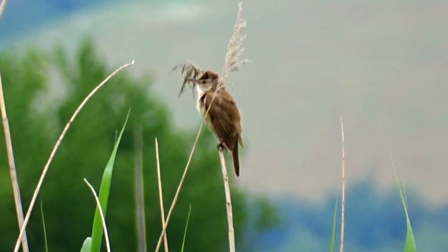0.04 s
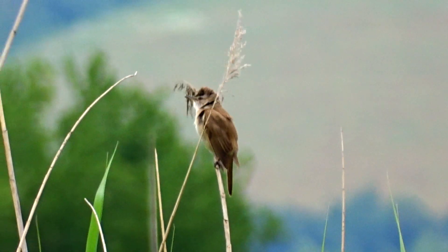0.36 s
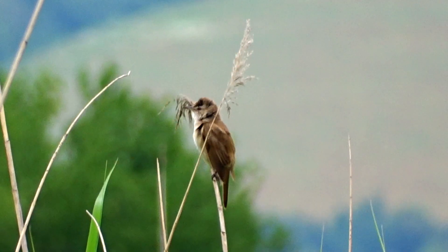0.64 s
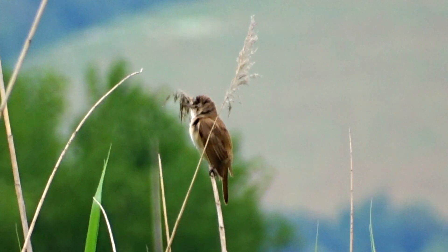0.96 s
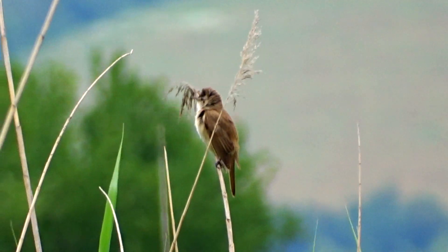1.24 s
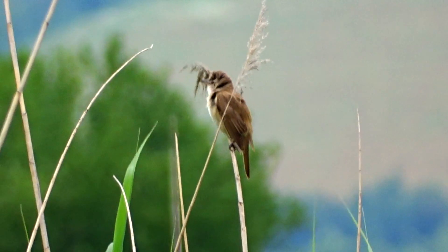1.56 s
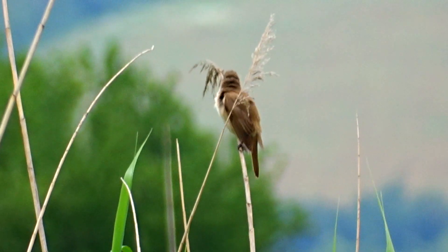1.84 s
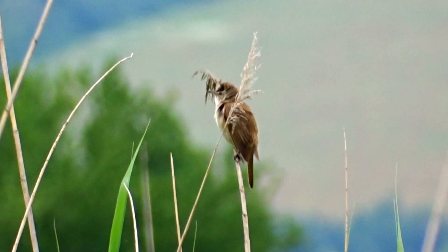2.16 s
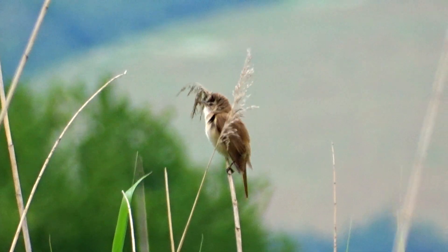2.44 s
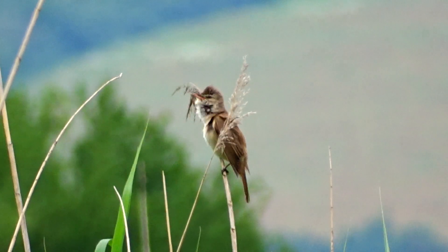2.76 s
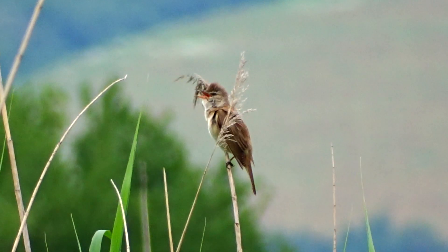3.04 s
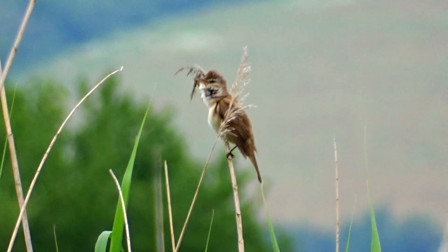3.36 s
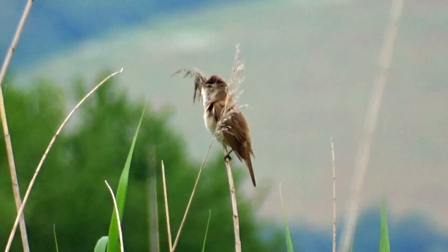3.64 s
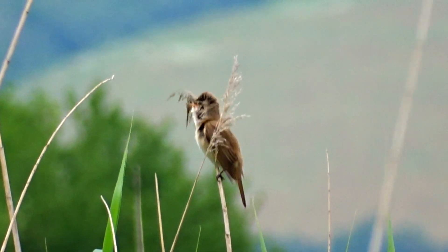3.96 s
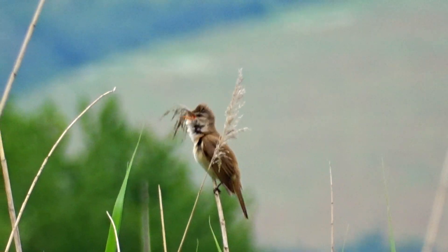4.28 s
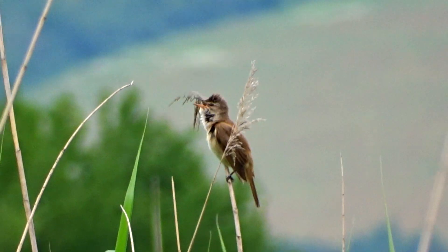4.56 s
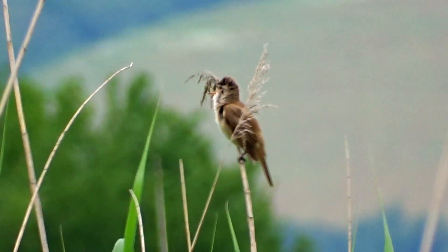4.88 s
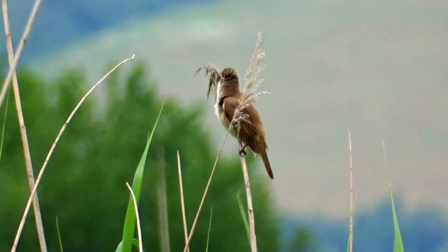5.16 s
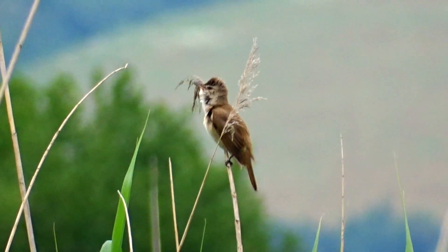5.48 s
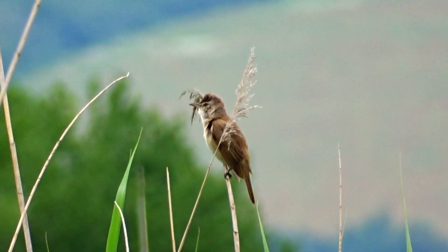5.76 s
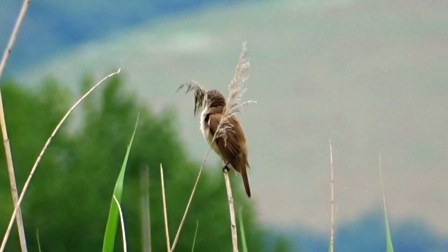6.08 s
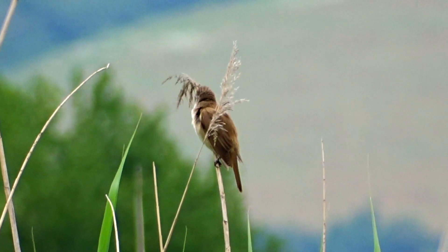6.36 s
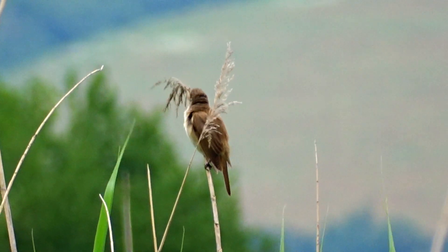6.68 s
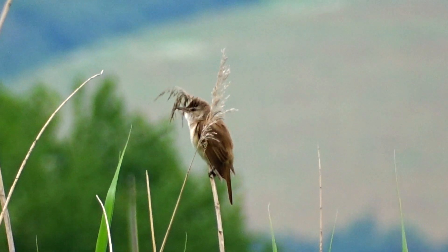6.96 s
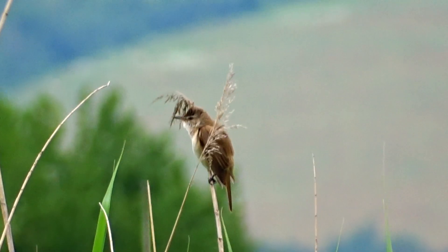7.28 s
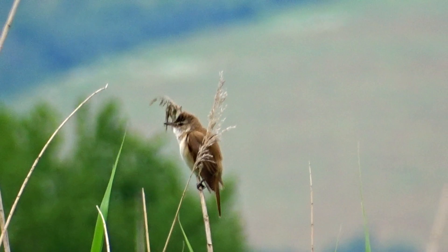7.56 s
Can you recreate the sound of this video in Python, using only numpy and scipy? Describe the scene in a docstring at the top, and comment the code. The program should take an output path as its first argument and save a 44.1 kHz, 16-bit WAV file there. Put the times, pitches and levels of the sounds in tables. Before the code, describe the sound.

Songbirds chirp, whistle and chatter harshly in a reed bed, one croaking close by, while light wind buffets the microphone.

```python
"""A near great reed warbler gives croaks, three loud calls and a nasal note.
Its syrinx is the source of tones and pulses, and the resonances of its throat filter them.
Buzzes, whistles and rasps sound further off; the reed bed scatters every note into a short tail.
Gusts buffet the microphone over a distant rumble and a soft hiss of reeds.
The camera's lens ticks faintly, and two knocks ring the modes of its body."""
import sys
import numpy as np
from scipy import signal
from scipy.fft import rfft, irfft, next_fast_len
from scipy.io import wavfile

SR = 44100
rng = np.random.default_rng(int(sys.argv[2]) if len(sys.argv) > 2 else 0)


def to_wav(s):
    """Save 16-bit WAV."""
    ch = np.atleast_2d(s).T  # columns
    pcm = np.round(np.clip(ch, -1, 1) * 32767)  # PCM
    wavfile.write(sys.argv[1], SR, pcm.astype(np.int16))


N = 344862
TIME = np.arange(N) / SR

# envelopes of the wind and of the distant rumble: (time [s], relative level [dB])
GUST_LEVELS = [(0.0, -81), (0.08, -76.5), (1.52, -71.5), (1.68, -55), (1.85, -62.5), (1.89, -47),
               (1.98, -53), (2.85, -70.5), (3.74, -65), (3.79, -50), (4.09, -49), (4.49, -71.5),
               (4.64, -62), (4.73, -39), (5.12, -52), (5.51, -47), (5.66, -57), (5.81, -48.5),
               (5.95, -56.5), (6.07, -51.5), (6.49, -69), (7.08, -53.5), (7.25, -65), (7.82, -71)]
RUMBLE_LEVELS = [(0.0, -79), (1.0, -75), (4.24, -74), (5.64, -69.5), (6.07, -73.5), (6.68, -70.5),
                 (7.82, -76)]
# envelopes of the far drone and the reeds: (time [s], drone level [dB], relative hiss level [dB])
DRONE_AND_HISS_LEVELS = [(0, -91, -77), (1.7, -71.5, -72.5), (2.2, -82.5, -72), (2.9, -65.5, -73),
                         (3.8, -77, -70), (4.4, -83, -67.5), (5.1, -65, -67), (6.1, -72, -71.5),
                         (6.75, -59.5, -71), (7.2, -64, -74.5), (7.82, -75.5, -72.5)]
# noise spectra: (frequency [Hz], relative spectral density [dB])
WIND_SPECTRUM = [(15, -5), (45, -1), (70, -3.5), (110, -11), (170, -19.5), (260, -37), (600, -62)]
RUMBLE_SPECTRUM = [(20, -25), (130, 8), (230, 2), (520, -2), (680, -0.5), (900, -5), (1150, 0),
                   (1350, -8.5), (1750, -12), (3000, -27)]
HISS_SPECTRUM = [(900, -7.5), (1800, 2), (2500, 9.5), (3300, 7), (4200, 10), (5300, 4.5), (6300, 3),
                 (7300, 6), (8300, 3), (11000, -2.5)]

# down-slurs, up-and-down hooks, thin arches: (start [s], end [s], nominal pitch [Hz], level [dB])
SLUR_NOTES = [(0.234, 0.276, 4360, -60.5), (0.712, 0.771, 4100, -57), (1.477, 1.523, 4390, -52.5)]
HOOK_NOTES = [(0.183, 0.205, 4400, -68), (1.019, 1.035, 3540, -55), (1.575, 1.605, 4400, -62),
              (1.056, 1.094, 3454, -49), (1.44, 1.459, 4180, -54), (1.553, 1.579, 3050, -58),
              (1.816, 1.844, 4480, -54), (1.978, 2.008, 2900, -59), (2.075, 2.115, 3000, -61.5),
              (1.165, 1.21, 2900, -67), (5.235, 5.28, 3070, -64.5), (5.305, 5.345, 3170, -64),
              (5.468, 5.505, 3350, -54), (5.608, 5.645, 3135, -52), (5.683, 5.706, 2830, -54.5),
              (7.632, 7.662, 3810, -55)]
ARCH_NOTES = [(0.682, 0.753, 5180, -62), (4.783, 4.849, 5310, -55.5), (5.565, 5.645, 5310, -56.5),
              (5.835, 5.908, 5230, -50.5), (6.857, 6.955, 5335, -50.5)]
# pitch contours over the nominal pitch: (start [ratio], middle [ratio], end [ratio])
SLUR_CONTOUR = (0.97, .81, .56)
HOOK_CONTOUR = (.81, 0.99, .74)
# warbles that dip, rise and dip again: (start [s], end [s], centre pitch [Hz], level [dB])
WARBLE_NOTES = [(0.311, 0.407, 2710, -71.5), (0.79, 0.875, 2860, -62), (1.875, 1.985, 2810, -59.5)]
# steep falling swoops: (start [s], end [s], first pitch [Hz], last pitch [Hz], level [dB])
SWOOP_NOTES = [(0.381, 0.4, 6240, 3760, -71), (2.522, 2.532, 6900, 4700, -56.5),
               (2.536, 2.557, 8430, 5700, -59), (2.555, 2.573, 7650, 6100, -56.5),
               (2.847, 2.869, 5940, 4300, -57), (2.87, 2.881, 9070, 4930, -54.5),
               (2.871, 2.879, 4320, 2420, -56.5), (2.882, 2.902, 8600, 6500, -53.5),
               (3.212, 3.236, 7430, 7000, -61), (6.943, 6.993, 7460, 3154, -50),
               (7.065, 7.073, 4950, 2300, -58), (7.369, 7.386, 7550, 4660, -56.5),
               (7.644, 7.714, 6900, 3200, -51)]
# tiny pips: (centre time [s], pitch [Hz], level [dB], glide [octaves])
PIP_NOTES = [(2.887, 3900, -55, -0.16), (6.648, 4010, -49, -0.11), (6.696, 5000, -50.5, 0.28),
             (6.715, 3420, -53.5, -0.064), (6.73, 4500, -53, 0.44), (6.762, 4080, -53.5, 0.22),
             (6.778, 2680, -59, .1), (6.795, 3620, -59.5, .1), (7.348, 3940, -46, 0.21),
             (7.438, 4110, -49.5, 0.2)]
# slow rising whistles: (start [s], end [s], last pitch [Hz], level [dB])
RISE_NOTES = [(1.098, 1.188, 3910, -61.5), (2.475, 2.553, 4510, -52.5), (2.904, 2.973, 4700, -52.5),
              (3.066, 3.132, 4170, -53), (7.275, 7.415, 3806, -53)]

# modes of the camera body: (frequency [Hz], relative level [dB], time to fall 60 dB [s])
BODY_MODES = [(128, -6.5, 0.12), (277, -14, .1), (392, -5.5, 0.084), (532, -5, 0.078), (796, 5.5, 0.016),
              (1240, 4.5, 0.021), (1750, 7, 0.0043), (2900, 9, 0.013), (8100, -4, .01)]
# impacts: (time [s], relative level [dB], low edge [Hz], high edge [Hz], crack decay time [s])
BODY_IMPACTS = [(.485, -47, 90, 575, 0.026), (3.762, -43.5, 730, 9600, 0.0045)]
# envelope of the lens ticks: (time [s], level [dB])
TICK_LEVELS = [(.56, -68), (2.0, -66.5), (3.6, -69.5), (3.9, -76), (4.2, -72), (4.5, -67), (5.6, -63),
               (7.82, -66)]

# sharp chacks: (time [s], relative level [dB])
CHACK_NOTES = [(0.5252, -57.5), (0.6572, -48), (1.269, -55.5), (1.335, -51.5), (1.6339, -46.5),
               (1.7367, -46.5), (5.7573, -42.5), (5.8637, -46), (5.9482, -46), (6.0235, -44.5),
               (6.098, -44), (6.3438, -42.5), (6.4518, -44.5), (7.4345, -44), (7.77, -49)]
# long harsh churrs: (start [s], end [s], throat resonance [Hz], level [dB])
CHURR_NOTES = [(1.834, 1.906, 4040, -58), (1.9, 2.0, 4000, -62), (2.029, 2.111, 4200, -56.5),
               (2.12, 2.235, 4870, -60.5), (2.266, 2.314, 4800, -58), (2.828, 2.9, 4950, -60.5),
               (2.89, 2.95, 7300, -59), (5.537, 5.622, 3040, -56.5), (6.138, 6.238, 3670, -56.5),
               (6.584, 6.75, 4200, -59), (6.861, 6.99, 4030, -61)]
# buzzes: (start [s], end [s], first pulse rate [Hz], last pulse rate [Hz], throat resonance [Hz],
# roughness [0-1], level [dB])
BUZZ_NOTES = [(2.287, 2.329, 900, 641, 4200, .22, -52), (3.109, 3.154, 1157, 1340, 4630, 0.4, -49),
              (3.339, 3.389, 615, 990, 4560, 0.38, -54.5), (3.467, 3.518, 620, 1024, 4450, 0.3, -53),
              (3.674, 3.728, 600, 1000, 4900, 0.2, -52), (3.846, 3.892, 1000, 1546, 6240, 0.4, -53.5),
              (3.866, 3.91, 640, 787, 3770, 0.38, -53), (3.999, 4.037, 943, 1604, 6160, 0.37, -53.5),
              (4.171, 4.218, 1046, 1174, 4650, .3, -50.5), (4.43, 4.464, 890, 1200, 3830, 0.26, -51),
              (5.018, 5.056, 597, 693, 4080, 0.53, -52), (6.283, 6.34, 736, 708, 4400, .65, -53),
              (6.46, 6.584, 560, 530, 4050, 0.57, -57.5), (7.112, 7.238, 1032, 904, 4350, 0.27, -58.5)]
# croaks: (first pulse [s], last pulse [s], pulses [count], pitch [Hz], final relative level [dB])
CROAK_RUNS = [(2.88, 2.953, 4, 2200, -55), (3.416, 3.444, 3, 2220, -50), (3.472, 3.498, 2, 2200, -50.5),
              (3.617, 3.644, 3, 2290, -45), (3.694, 3.694, 1, 2150, -45.5), (5.344, 5.394, 2, 2395, -51.5),
              (5.422, 5.448, 2, 2800, -43), (5.462, 5.462, 1, 2444, -43), (5.544, 5.598, 3, 2815, -43),
              (6.407, 6.407, 1, 2560, -53), (7.768, 7.768, 1, 2970, -55)]
# loud calls: (second croak [s], third croak [s], nominal whistle pitch [Hz], relative level [dB],
# dip in the whistle [dB])
CALLS = [(4.204, 4.243, 3200, -38.5, -10), (4.470, 4.514, 3250, -39, 0), (4.775, 4.814, 3212, -41.5, -12)]
# the three croaks of a call: (half-length [s], pitch [Hz], relative level [dB])
CALL_PULSES = [(.006, 2590, -9), (.008, 2704, 0), (.013, 2620, 1.5)]
# course of the nasal note: (time [s], nominal pitch [Hz], level [dB])
NASAL_CONTOUR = [(5.036, 3480, -53), (5.046, 3838, -43), (5.064, 3876, -47.5), (5.09, 3775, -58),
                 (5.126, 4026, -44), (5.16, 3990, -51), (5.172, 3900, -61), (5.184, 4100, -49.5),
                 (5.198, 3900, -50.5), (5.206, 4066, -71)]
# partials of the loud whistle and the nasal note: (frequency over pitch [ratio], relative level [dB])
CALL_SPECTRUM = [(1 / 2, -29.5), (0.99, 0), (3 / 2, -29), (5 / 2, -26)]
NASAL_SPECTRUM = [(2 / 3, -15.5), (0.99, 0), (4 / 3, -15), (5 / 3, -31)]


def undb(db):
    """Amplitude ratio of a level in decibels."""
    return 10 ** (np.asarray(db) / 20)


def unit(x):
    """Normalisation to rms 1."""
    return x / np.sqrt(np.mean(x ** 2) + 1e-20)


def add(out, start, sound, pan_db):
    """Level panning: mix a sound in with the left channel louder by pan_db."""
    i = max(int(start * SR), 0)
    sound = sound[:N - i]
    out[:, i:i + len(sound)] += undb([[pan_db / 2], [-pan_db / 2]]) * sound


def wander(size, rate_hz):
    """Random modulation: Gaussian values drawn at rate_hz and joined by straight lines."""
    at = np.arange(size) * rate_hz / SR
    points = int(at[-1]) + 2
    return np.interp(at, np.arange(points), rng.standard_normal(points))


def resonance(hz, centre, width):
    """Complex response of a damped resonator, 1 at its centre."""
    return 1 / (1 + 1j * (hz ** 2 - centre ** 2) / (hz * width + 1e-9))


def filtered(x, gain):
    """Linear filtering: the spectrum is multiplied by gain(frequency)."""
    size = next_fast_len(x.shape[-1] + 512)
    hz = np.maximum(np.fft.rfftfreq(size, 1 / SR), 1)
    return irfft(rfft(x, size) * gain(hz), size)[..., :x.shape[-1]]


def colour(points):
    """Frequency response through points of (frequency [Hz], gain [dB])."""
    f, db = np.transpose(points)
    return lambda hz: undb(np.interp(np.log(hz), np.log(f), db))


def progress(start, end):
    """Normalised time u, from 0 to 1 over a note."""
    return np.linspace(0, 1, max(int((end - start) * SR), 128))


def arc(u, pitches):
    """Parabolic glide in log frequency through a start, middle and end pitch."""
    return np.exp(np.polyval(np.polyfit([0, .5, 1], np.log(pitches), 2), u))


def swell(u, power):
    """Amplitude envelope: the air pressure rises and falls over a note."""
    return unit(np.abs(np.sin(np.pi * u)) ** power)


def phase_of(hz):
    """Phase as the integral of frequency."""
    return 2 * np.pi * np.cumsum(hz) / SR


def air_noise(spectrum, band_hz, side_db, flicker_db):
    """Coloured noise, set to rms 1 within band_hz, then modulated independently in each octave."""
    noise = filtered(rng.standard_normal((2, N)), colour(spectrum))
    noise /= np.std(filtered(noise[0], lambda f: (f > band_hz[0]) & (f < band_hz[1])))
    flickering = 0
    for octave in range(4, 15):
        band = filtered(noise, lambda f: np.maximum(1 - abs(np.log2(f) - octave), 0))
        flickering = flickering + band * undb(flicker_db * wander(N, 14))
    mid, side = flickering
    return mid + undb(side_db) * side * np.array([[1], [-1]])


def wind(gain_db=.84):
    """Gusts buffet the microphone with low-frequency pressure fluctuations."""
    noise = air_noise(WIND_SPECTRUM, band_hz=(11, 180), side_db=-12, flicker_db=2.5)
    gust_db = np.interp(TIME, *np.transpose(GUST_LEVELS))
    return noise * undb(gust_db + gain_db + 2 * wander(N, 10))


def distant_rumble(drone_hz=330, width_hz=347):
    """Broadband rumble and a drone of resonance-filtered noise swell on separate envelopes."""
    rumble = air_noise(RUMBLE_SPECTRUM, band_hz=(196, 544), side_db=-1.5, flicker_db=3)
    rumble_db = np.interp(TIME, *np.transpose(RUMBLE_LEVELS))
    drone = filtered(rng.standard_normal((2, N)), lambda f: resonance(f, drone_hz, width_hz) ** 2)
    times, drone_db, _ = np.transpose(DRONE_AND_HISS_LEVELS)
    return rumble * undb(rumble_db) + unit(drone) * undb(np.interp(TIME, times, drone_db))


def reed_hiss():
    """Reeds radiate broadband noise; opposite treble tilts make it brighter on the right."""
    times, _, hiss_db = np.transpose(DRONE_AND_HISS_LEVELS)
    noise = air_noise(HISS_SPECTRUM, band_hz=(7500, 14700), side_db=-6, flicker_db=2.5)
    left, right = noise * undb(np.interp(TIME, times, hiss_db))
    tilt = colour([(6000, 0), (10000, 3)])
    return np.array([filtered(left, lambda f: 1 / tilt(f)), filtered(right, tilt)])


def chirp(u, hz, jitter=.023, flutter_db=2.1, undertone_db=-11):
    """Random frequency and amplitude modulation make a gliding tone tremble."""
    phase = phase_of(hz * (1 + jitter * wander(len(u), 1272)))
    # a high glide is a second harmonic, whose fundamental fades as it sinks
    undertone = (hz[0] > 6000) * undb(undertone_db) * (hz / hz.max()) ** 2
    tone = np.sin(phase) + undertone * np.sin(phase / 2)
    grain = 1 + .25 * wander(len(u), 1800)
    return unit(tone * grain) * swell(u, .39) * undb(flutter_db * wander(len(u), 302))


def neighbour_whistles(warble_depth=.18, warble_cycles=1.5, swoop_sag=.2, pip_s=.013, pan_db=5):
    """Frequency modulation shapes the slurs, hooks, warbles, swoops and pips of a bird on the left."""
    out = np.zeros((2, N))
    for notes, contour in [(SLUR_NOTES, SLUR_CONTOUR), (HOOK_NOTES, HOOK_CONTOUR)]:
        for start, end, hz, db in notes:
            u = progress(start, end)
            add(out, start, chirp(u, hz * arc(u, contour)) * undb(db - 2.4 * u), pan_db)
    for start, end, hz, db in WARBLE_NOTES:
        u = progress(start, end)
        pitch = hz * (1 - warble_depth * np.sin(2 * np.pi * warble_cycles * u))
        add(out, start, chirp(u, pitch) * undb(db), pan_db)
    for start, end, from_hz, to_hz, db in SWOOP_NOTES:
        u = progress(start, end)
        middle_hz = from_hz * (to_hz / from_hz) ** (.5 + swoop_sag)
        swoop = chirp(u, arc(u, [from_hz, middle_hz, to_hz])) * swell(u, .12)
        add(out, start, swoop * undb(db + 4.5 * (.5 - u)), pan_db)
    for centre, hz, db, octaves in PIP_NOTES:
        u = progress(0, pip_s)
        pip = chirp(u, hz * 2 ** (octaves * (u - .5))) * swell(u, .67)
        add(out, centre - pip_s / 2, pip * undb(db), pan_db)
    return out


def camera_knocks(crack_share=.25):
    """Modal ringing: a soft bump and a hard click excite one body, and each contact cracks briefly."""
    out, t = np.zeros((2, N)), np.arange(SR // 6) / SR
    body = sum(undb(db - 60 * t / t60) * np.sin(2 * np.pi * hz * t) for hz, db, t60 in BODY_MODES)
    for start, db, low_hz, high_hz, decay_s in BODY_IMPACTS:
        crack = crack_share * np.abs(body).max() * rng.standard_normal(len(t)) * np.exp(-t / decay_s)
        contact = signal.butter(4, [low_hz, high_hz], "band", fs=SR, output="sos")
        add(out, start, undb(db) * signal.sosfilt(contact, body + crack), pan_db=-2.5)
    return out


def beak(hz, cutoff_hz=7700):
    """The beak acts as a steep low-pass filter."""
    return 1 / np.sqrt(1 + (hz / cutoff_hz) ** 20)


def tract(hz, throat_hz, width_hz, beak_hz, beak_db):
    """Formant filter: the throat resonance plus a weaker, higher one of the beak."""
    throat_gain = abs(resonance(hz, throat_hz, width_hz)) ** 2
    beak_gain = undb(beak_db) * abs(resonance(hz, beak_hz, width_hz)) ** 2
    return (throat_gain + beak_gain) * beak(hz)


def rasp(u, throat_hz, rate_hz=560, jitter=.085, breath=.62):
    """Source and filter: irregular syrinx pulses, mixed with air noise, ring the throat."""
    phase = phase_of(rate_hz * (1 + jitter * wander(len(u), 500) + .1 * wander(len(u), 40)))
    pulses = np.diff(phase // (2 * np.pi), prepend=0)
    source = unit(pulses) + breath * rng.standard_normal(len(u)) * (1 + np.cos(phase))
    return unit(filtered(
        source, lambda f: tract(f, throat_hz, width_hz=1250, beak_hz=1.42 * throat_hz, beak_db=-19)))


def chacks_and_churrs(chack_s=.04, attack_s=.0049, decay_s=.03, chack_db=-7, syllable_db=3, pan_db=3):
    """Envelopes shape a rasp: chacks decay exponentially, churrs break into uneven syllables."""
    out = np.zeros((2, N))
    for start, db in CHACK_NOTES:
        u = progress(0, chack_s)
        t = u * chack_s
        envelope = np.minimum(t / attack_s, 1) * np.exp(-t / decay_s)
        add(out, start, rasp(u, throat_hz=4150) * envelope * undb(db + chack_db), pan_db)
    for start, end, throat_hz, db in CHURR_NOTES:
        u = progress(start, end)
        syllables = unit(undb(syllable_db * wander(len(u), 59.6)))
        add(out, start, rasp(u, throat_hz) * syllables * swell(np.sqrt(u), .43) * undb(db), pan_db)
    return out


def lens_ticks(hz=665, first_s=.558, ring_s=.019, period_s=1 / 25, scatter_db=2.6):
    """Periodic excitation: the lens mechanism rings in short bursts of uneven pitch and level."""
    out, u = np.zeros((2, N)), progress(0, ring_s)
    starts = np.arange(first_s, TIME[-1], period_s)
    levels = np.interp(starts, *np.transpose(TICK_LEVELS))
    for start, db in zip(starts, levels):
        strength, detune, pan, angle = rng.standard_normal(4)
        ring = np.sin(2 * np.pi * hz * (1 + .04 * detune) * ring_s * u + 2 * angle)
        add(out, start, ring * swell(u, 2) * undb(db + scatter_db * strength), pan_db=2 * pan)
    return out


def slow_whistles(rise_from_hz=3200, pan_db=1):
    """Slow frequency sweeps with little jitter: thin arches, and linear rises from one pitch."""
    out = np.zeros((2, N))
    for start, end, hz, db in ARCH_NOTES:
        u = progress(start, end)
        add(out, start, chirp(u, hz * arc(u, [.93, 1, .88]), jitter=.0085) * undb(db), pan_db)
    for start, end, hz, db in RISE_NOTES:
        u = progress(start, end)
        pitch = rise_from_hz + (hz - rise_from_hz) * u
        add(out, start, chirp(u, pitch, jitter=.012) * undb(db), pan_db)
    return out


def far_chorus(count=22, first_s=.8, hz=2800, loudest_db=-70):
    """Warblers deep in the reeds give randomly timed hooks, faint with distance."""
    out = np.zeros((2, N))
    for when, length, pitch, loudness in rng.random((count, 4)):
        start = first_s + when * (TIME[-1] - first_s)
        u = progress(0, .02 * (1 + length))
        note = chirp(u, hz * 2 ** ((pitch - .5) / 2) * arc(u, HOOK_CONTOUR))
        add(out, start, note * undb(loudest_db + 4.7 * (loudness - 1)), pan_db=2)
    return out


def buzzes(jitter=.073, breath=.84, throat_follow=.7, windpipe_hz=3640, width_hz=1500):
    """Harmonics of a gliding pulse train pass a moving throat formant and steady beak and windpipe ones."""
    out = np.zeros((2, N))
    formants = dict(width_hz=width_hz, beak_hz=7000, beak_db=-14)
    k = np.arange(2, 14)[:, None]  # harmonic numbers
    for start, end, from_hz, to_hz, throat_hz, rough, db in BUZZ_NOTES:
        u, mean_hz = progress(start, end), np.sqrt(from_hz * to_hz)
        glide = arc(u, [from_hz, .98 * mean_hz, to_hz])
        rate = glide * (1 + jitter * rough * wander(len(u), 1276) + .012 * wander(len(u), 125.5))
        phase = phase_of(rate)
        moving_throat_hz = throat_hz * (glide / mean_hz) ** throat_follow
        windpipe = undb(-7.5) * abs(resonance(k * rate, windpipe_hz, width_hz)) ** 3
        waver = undb([10 * rough * wander(len(u), 218) for _ in k])
        gain = (tract(k * rate, moving_throat_hz, **formants) + windpipe) * waver
        voice = unit((gain * np.sin(k * phase + k ** 2 / 2)).sum(0))
        puffs = rng.standard_normal(len(u)) * (1 + np.cos(phase))
        air = unit(filtered(puffs, lambda f: tract(f, throat_hz, **formants)))
        buzz = unit(voice + breath * rough * air) * swell(u ** 1.24, .52)
        add(out, start, buzz * undb(db), pan_db=2)
    return out


def croak_pulse(half_s, hz, fall=.222, beat_hz=620, chop=.27, noise_db=-5):
    """Amplitude modulation: an irregular syrinx beat chops a falling chirp and a higher noise band."""
    u = progress(-half_s, half_s)
    phase = phase_of(hz * (1 + fall * (.5 - u)) * (1 + .076 * wander(len(u), 1770)))
    beat = np.cos(phase_of(beat_hz * (1 + .406 * wander(len(u), 548))))
    tone = np.sin(phase) * (1 + chop * beat)
    puffs = rng.standard_normal(len(u)) * (1 + beat)
    noise = filtered(puffs, lambda f: resonance(f, 1.37 * hz, 1900) ** 2 * beak(f, cutoff_hz=4300))
    return unit(unit(tone) + undb(noise_db) * unit(noise)) * np.sin(np.pi * u) ** 2


def croaks(typical_half_s=.008, uneven=.25, growth_db=2.4, gain_db=.5):
    """Short pulse trains: evenly spaced pulses of uneven length, each louder than the one before."""
    out = np.zeros((2, N))
    for first, last, pulses, hz, db in CROAK_RUNS:
        for remaining, centre in enumerate(np.linspace(last, first, pulses)):
            half_s = typical_half_s * np.exp(uneven * rng.uniform(-.997, 1))
            pulse = croak_pulse(half_s, hz) * undb(db + gain_db - growth_db * remaining)
            add(out, centre - half_s, pulse, pan_db=-1)
    return out


def clear_tone(hz, partials, jitter):
    """Selective resonance: the throat favours one partial of the syrinx and lets its neighbours leak."""
    phase = phase_of(hz * (1 + jitter * wander(len(hz), 726)))
    tone = sum(undb(db) * np.sin(k * phase) for k, db in partials)
    tremble = undb(1.3 * wander(len(hz), 260)) * (1 + .08 * wander(len(hz), 1800))
    return unit(tone * tremble) * signal.windows.tukey(len(hz), .06)


def loud_calls(rattles=3, rattle_half_s=.0048, whistle_delay_s=.007, drop=.35, fade_db=4):
    """Pulses, then a tone: three croaks, a rattle before the last, a whistle falling by a power law."""
    out = np.zeros((2, N))
    for second, third, hz, db, dip_db in CALLS:
        beat_s = third - second
        for centre, (half_s, croak_hz, croak_db) in zip([second - beat_s, second, third], CALL_PULSES):
            add(out, centre - half_s, croak_pulse(half_s, croak_hz) * undb(db + croak_db), pan_db=-1.5)
        for centre in np.linspace(second, third, rattles + 2)[1:-1]:
            rattle = croak_pulse(rattle_half_s, hz=2600) * undb(db - 8)
            add(out, centre - rattle_half_s, rattle, pan_db=-1.5)
        u = progress(0, 1.99 * beat_s)
        whistle = clear_tone(hz * (1 - drop * u ** 4.2), CALL_SPECTRUM, jitter=.01) * swell(u, .39)
        catch_db = dip_db * np.exp(-((u - .72) / .08) ** 2)  # the level dips briefly
        add(out, third + whistle_delay_s, whistle * undb(db + catch_db - fade_db * u), pan_db=2)
    return out


def nasal_note():
    """Partials on both sides of the strongest one give a held, wavering note its nasal timbre."""
    out = np.zeros((2, N))
    times, hz, db = np.transpose(NASAL_CONTOUR)
    t = np.arange(times[0], times[-1], 1 / SR)
    tone = clear_tone(np.interp(t, times, hz), NASAL_SPECTRUM, jitter=.011)
    add(out, times[0], tone * undb(np.interp(t, times, db)), pan_db=.5)
    return out


def reed_bed(x, wet_db, t60_s=.4, spread=.29):
    """Scattering from countless stems adds an exponentially decaying tail, mostly from the front."""
    t = np.arange(SR // 2) / SR
    mid, side = rng.standard_normal((2, len(t))) * undb(-60 * t / t60_s) * (t > 0)
    tail = np.array([mid + spread * side, mid - spread * side])
    tail /= np.sqrt(np.sum(tail ** 2) / 2)
    return x + undb(wet_db) * signal.fftconvolve(x, tail, axes=1)[:, :N]


def scene():
    """Superposition of all sources; the ratio of scattered to direct sound grows with distance."""
    near = croaks() + loud_calls() + nasal_note()
    further = neighbour_whistles() + slow_whistles() + buzzes() + chacks_and_churrs() + far_chorus()
    birds = reed_bed(near, wet_db=-14) + reed_bed(further, wet_db=-8)
    return birds + wind() + distant_rumble() + reed_hiss() + lens_ticks() + camera_knocks()


def record(dry):
    """Band limiting: the camera's steep low-pass filter removes the highest treble."""
    cutoff_hz = 11150
    return signal.sosfiltfilt(signal.ellip(10, .1, 60, cutoff_hz, fs=SR, output="sos"), dry)


dry = scene()
out = record(dry)
to_wav(out)
```